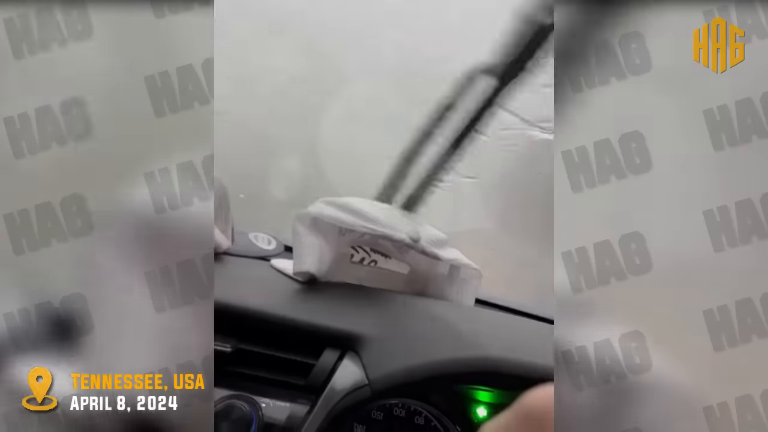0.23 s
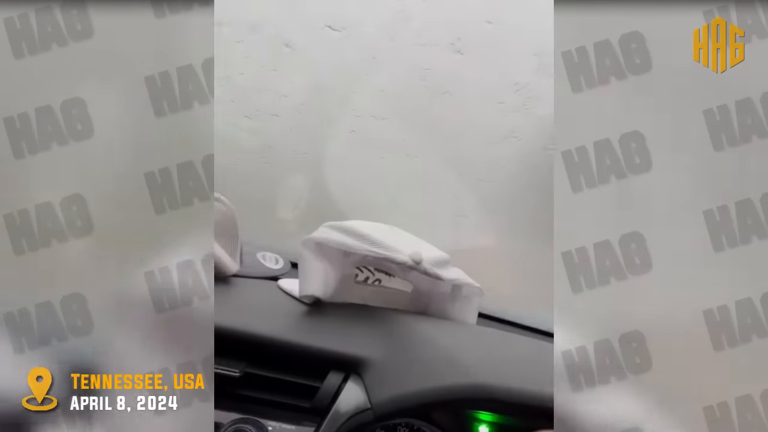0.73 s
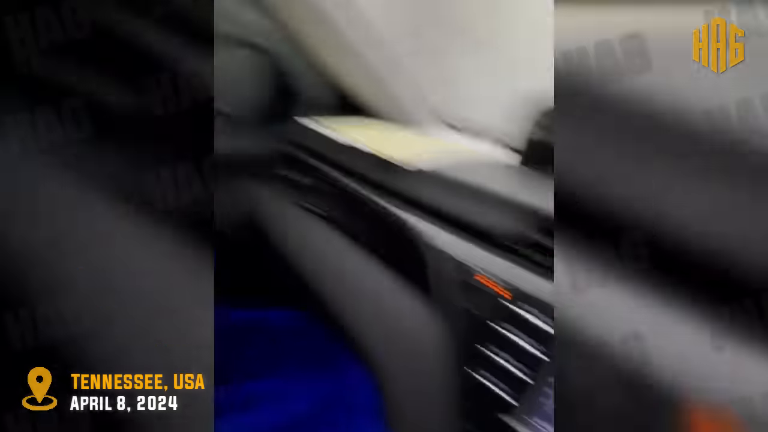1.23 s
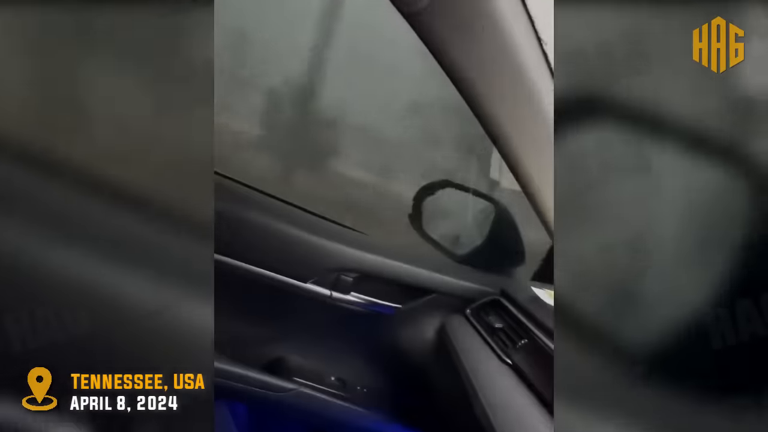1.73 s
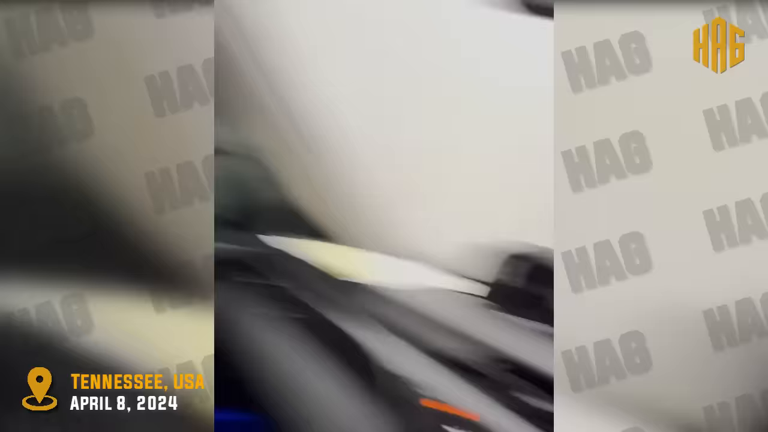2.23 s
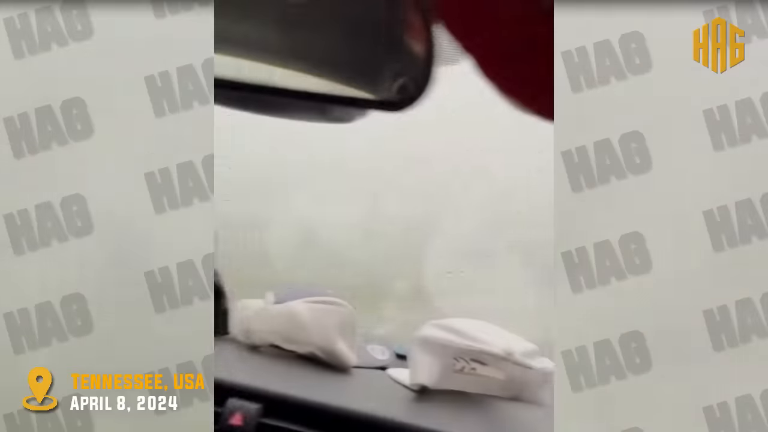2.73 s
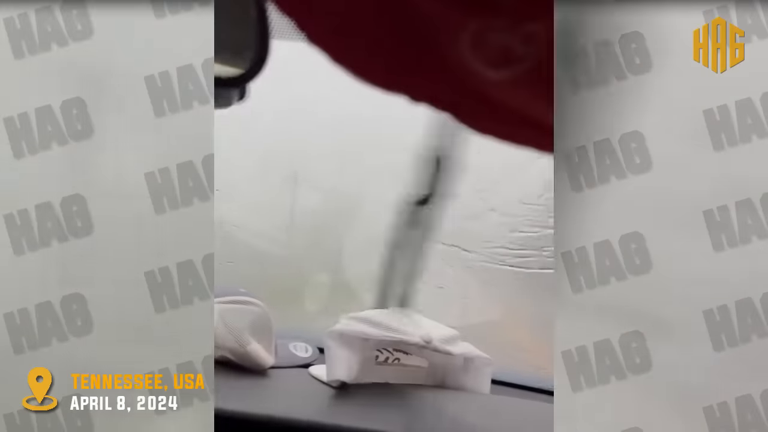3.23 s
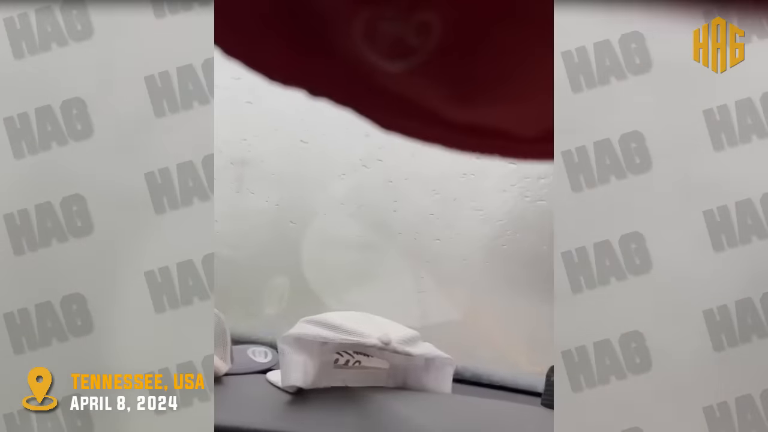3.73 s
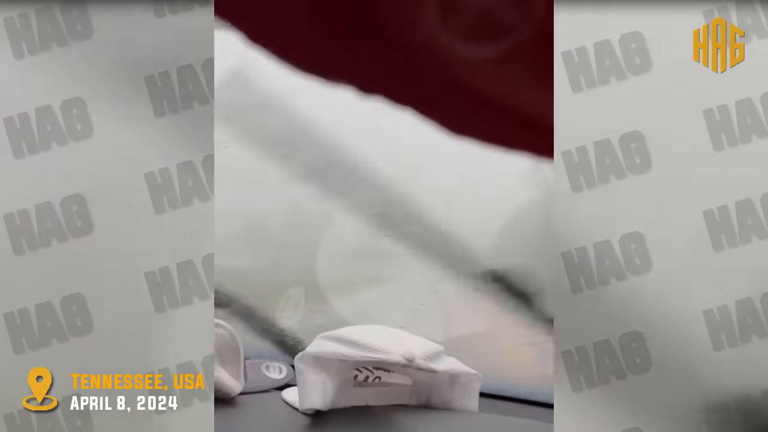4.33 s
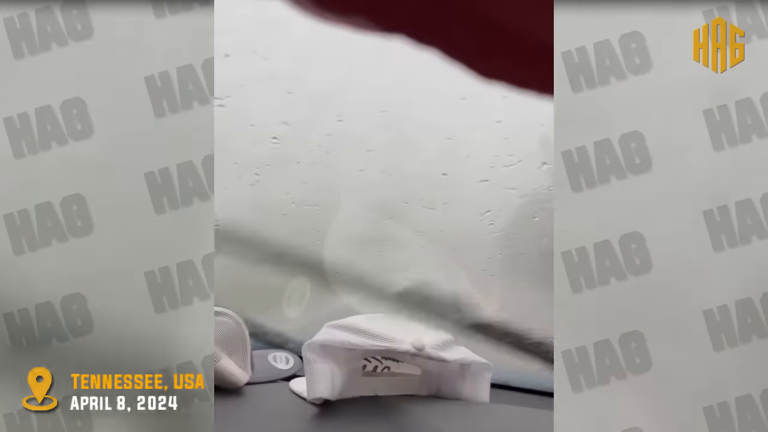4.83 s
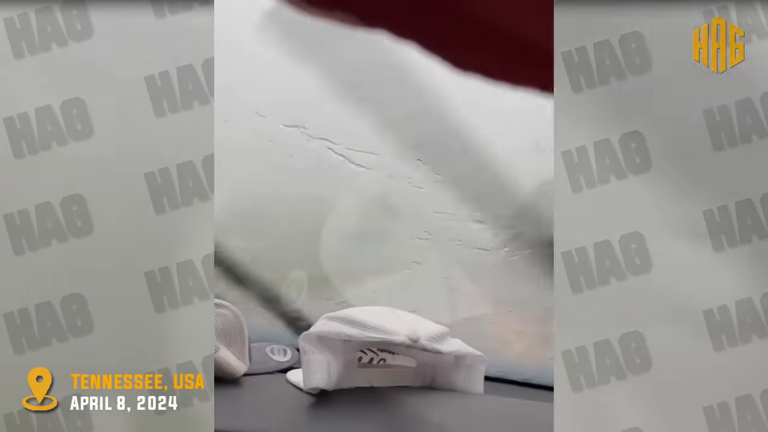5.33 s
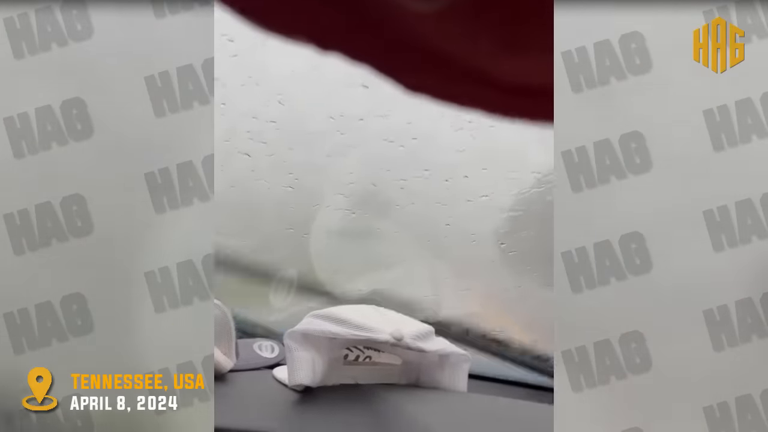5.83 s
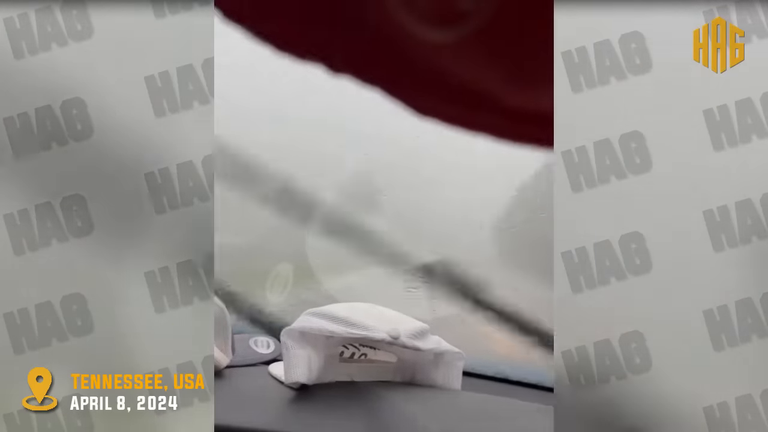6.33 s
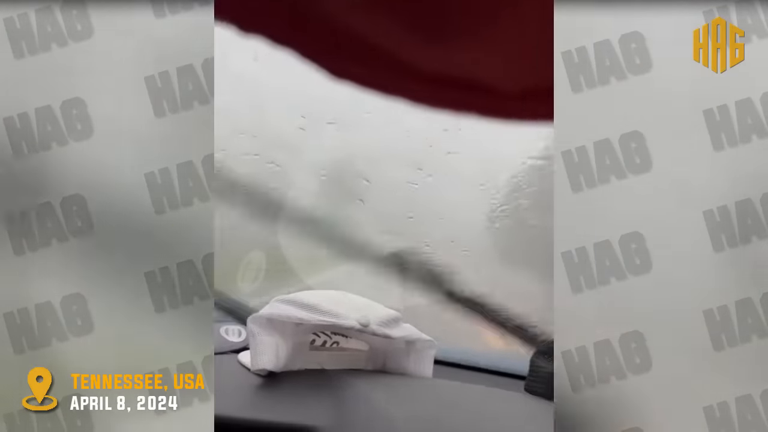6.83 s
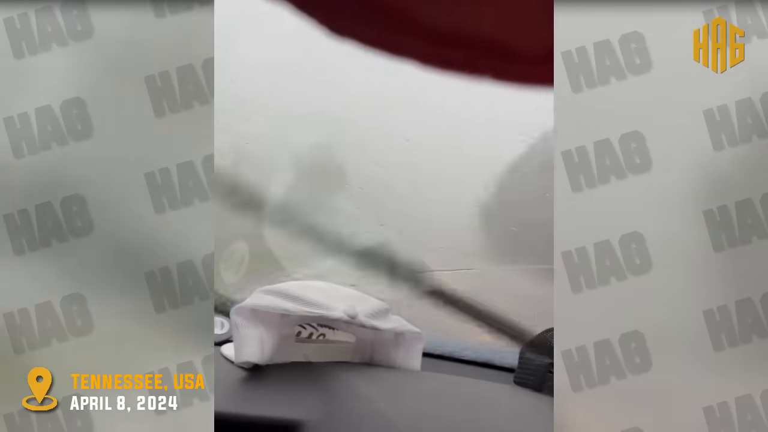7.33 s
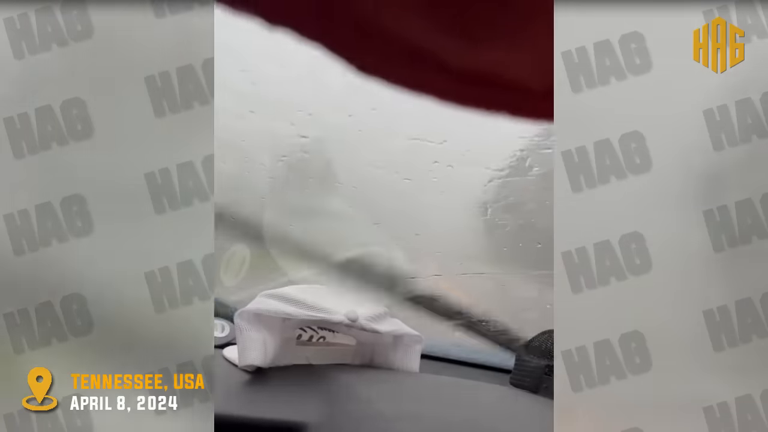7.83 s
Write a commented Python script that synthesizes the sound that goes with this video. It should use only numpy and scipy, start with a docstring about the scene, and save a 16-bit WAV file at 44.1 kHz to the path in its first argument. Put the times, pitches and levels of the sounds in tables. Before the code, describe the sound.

Heard from the driver's seat of a closed car: big hailstones strike the roof with blunt, boomy thuds and knock on the windshield with short cracks. Small stones tick and splinter over a faint uneven patter and low rumble. Blows are thick at the start, strongest around three to five seconds, then sparser. Close, nearly mono pickup, loud peaks slightly squashed.

```python
"""Hail on a car

Hail falls on a car, heard from the driver's seat: impact excitation of plates and of the cabin air.
Big stones thud on the lined steel roof and knock on the windshield: noise bursts shaped by resonances,
whose dispersive bending waves arrive as a quick falling chirp. Small stones tick and shatter on the glass
over a fine patter of noise under random impact envelopes and a low, filtered-noise cabin rumble."""
import sys
import numpy as np
from scipy import signal
from scipy.fft import rfft, irfft
from scipy.io import wavfile
from scipy.ndimage import uniform_filter1d, minimum_filter1d

SR = 44100
rng = np.random.default_rng(int(sys.argv[2]) if len(sys.argv) > 2 else 0)


def master(y):
    """Save y as 16-bit WAV."""
    cut = np.clip(np.atleast_2d(y).T, -1, 1)
    pcm = np.round(cut * 32767)  # scale
    wavfile.write(sys.argv[1], SR, pcm.astype(np.int16))


N = 355710
BLOW_SIZE = 2 ** 14  # samples computed for each blow
BLOW_S = np.arange(BLOW_SIZE) / SR
BLOW_HZ = np.fft.rfftfreq(BLOW_SIZE, 1 / SR)
ALL_HZ = np.fft.rfftfreq(N, 1 / SR)
LEVEL_SPAN_S = 0.02  # a blow has the energy of rms 1 held this long
TYPICAL_BLOW_DB = -16  # table knock level at which the force of a big stone counts as 0 dB

# All table levels are relative: the *_db settings of the functions shift each voice as a whole.

# big stones on the roof: (time [s], knock [dB], boom above the knock [dB],
# basic ring t60 [s], pitch of the struck spot [Hz])
ROOF_HITS = [(0.062,-8,-19,0.13,380),(0.117,-9,-0.5,0.17,660),(0.171,-22,8,0.31,410),(0.462,-21,0,0.27,365),(0.536,-15.5,2.5,0.13,325),(0.607,-14.5,-4,0.16,342),(1.002,-20,2,0.13,495),(1.391,-22,-8,0.17,275),(1.575,-22,-1,0.26,430),(1.78,-16.5,-4,.21,377),(1.92,-22.5,-20,0.2,600),(2.052,-23.5,2,0.13,410),(2.078,-7.5,-3,0.15,302),(2.103,-11,1,0.16,567),(2.234,-23.5,-7,0.063,278),(2.405,-13.5,-26,0.18,300),(2.594,-22.5,-12,0.11,630),(2.685,-13,2.5,0.098,480),(3.037,-14.5,-2,0.12,298),(3.267,-11,10.5,0.21,267),(3.303,0,-3,0.18,332),(3.335,-10.5,5,0.244,374),(3.843,-21.5,-5,0.25,420),(4.229,-23.5,0,0.11,484),(4.256,-1.5,-5.5,0.095,595),(4.42,-25,-1,0.52,523),(4.8,-26,6,0.35,273),(5.341,-7.5,1.5,0.14,363),(5.37,-19,-3,.19,324),(5.472,-19.5,-7,0.14,780),(6.227,-32,-14,0.21,660),(6.56,-21,4.5,0.23,362),(6.808,-21.5,2.5,0.39,640),(6.946,-30.5,11.5,0.11,229),(7.528,-8,0.5,0.21,623),(7.744,-24,4,0.17,374)]
# knock of a struck panel: (frequency [Hz], density [dB per Hz])
KNOCK = [(120, -16.5), (210, -1), (360, 2), (510, -4), (670, -2.5), (920, -12.5), (1900, -50.5)]
# boom of the cabin air: (frequency [Hz], density [dB per Hz])
BOOM = [(22, -38), (42, 0), (70, -2.5), (125, 5.5), (165, 6.5), (215, -18), (400, -73)]
# crack of a stone on the roof: (frequency [Hz], density [dB per Hz])
ROOF_CRACK = [(550, -14.5), (850, -1), (1180, 6.5), (3200, -11.5), (7500, -17), (16000, -50)]
ROOF_CRACK_FOLLOWS = 0.72  # dB of crack per dB of knock: the lining softens the crack


def roof(knock_db=1.5, boom_db=2.0, crack_db=-26.5, travel_s=0.001494, swell=0.036, near_s=0.071,
         boom_ring=1.08, crack_ring=0.742):
    """Coupled plate and cavity: the steel rings behind its lining; the cabin air builds up and dies slowest."""
    out = np.zeros((2, N))
    path = bending(travel_s)
    knock, boom, crack = (body(spectrum) * path for spectrum in (KNOCK, BOOM, ROOF_CRACK))
    for s, db, boom_rel, t60, hz in ROOF_HITS:
        force_db = db - TYPICAL_BLOW_DB
        boom_level = db + boom_rel
        crack_level = ROOF_CRACK_FOLLOWS * force_db
        direct = (near_s / t60) ** 2  # short blows land close by: their direct wave dominates
        struck_spot = spot(hz, lift=1.6, sharpness=11.3)
        # the boom crosses the bending path twice
        cavity = boom * path * cabin_boom(boom_level)
        wave = from_db(knock_db + db) * blow(knock * struck_spot, t60, swell, direct)
        wave += from_db(boom_db + boom_level) * blow(cavity, t60 * boom_ring, 2 * swell, direct)
        wave += from_db(crack_db + crack_level) * blow(crack, t60 * crack_ring, swell, direct)
        add(out, s - travel_s, wave)
    return out


# big stones on the windshield: (time [s], knock [dB], boom above the knock [dB], crack above the knock [dB])
GLASS_HITS = [(0.746,-33.5,-7,4.5),(2.297,-12.5,-2,-11.5),(2.326,-27.5,-6,1),(2.549,-23,-16,-5),(2.87,-32,-10,-5.5),(3.129,-19,-7,-4.5),(3.709,-15,0,-3.5),(4.027,-31.5,-12,0),(4.147,-25,-7,-5),(4.752,-19,-12.5,-11),(4.938,-6,3,-10.5),(4.999,-5,-12,-26),(5.073,-22.5,-16,-11),(5.171,-18,-2,-2.5),(5.913,-14,2.5,-7),(6.462,-32.5,2,-1),(7.21,-28,-11,-15),(7.689,-21,7,-2)]
# crack of a stone on glass: (frequency [Hz], density [dB per Hz])
GLASS_CRACK = [(350, -4), (900, 2), (1500, 0), (2400, 2), (3600, -5), (7000, -26)]
# splintering ice: (frequency [Hz], density [dB per Hz])
SPLINTER = [(1500, -16.5), (3200, -0.5), (4900, 1.5), (5800, 4.5), (8600, 0.5), (10800, -8), (15500, -12),
            (17000, -137)]
GLASS_RING_S = 0.0553  # t60 of the knock
# a heavier stone stays longer in contact, so its splinter falls behind its crack
SPLINTER_DULLING = 0.59  # dB per dB of knock


def windshield(knock_db=0.0, boom_db=0.0, crack_db=1.0, splinter_db=-6.0, travel_s=0.0022, swell=0.027,
               direct=1.36, boom_ring=1.54, crack_ring=0.616, splinter_ring=0.7):
    """Damped plate: laminated glass gives a strong direct chirp and a short ring, with splintering ice on top."""
    out = np.zeros((2, N))
    path = bending(travel_s)
    knock, boom, crack, splinter = (body(spectrum) * path for spectrum in (KNOCK, BOOM, GLASS_CRACK, SPLINTER))
    cavity = boom * spot(hz=108, lift=0.97, sharpness=2.2)
    for s, db, boom_rel, crack_rel in GLASS_HITS:
        boom_level, crack_level = db + boom_rel, db + crack_rel
        splinter_level = crack_level - SPLINTER_DULLING * (db - TYPICAL_BLOW_DB)
        # the pane rings near the struck point
        ping = spot(1750 * 2 ** rng.uniform(-0.49, 0.18), lift=1.15, sharpness=4.2)
        wave = from_db(knock_db + db) * blow(knock, GLASS_RING_S, swell, direct)
        wave += from_db(boom_db + boom_level) * blow(cavity, GLASS_RING_S * boom_ring, swell, direct)
        wave += from_db(crack_db + crack_level) * blow(
            crack * ping, GLASS_RING_S * crack_ring, swell, direct / 2)
        wave += from_db(splinter_db + splinter_level) * blow(
            splinter, GLASS_RING_S * splinter_ring, swell, direct / 2)
        add(out, s - travel_s / 2, wave)
    return out


# the clearest small stones on the windows: (time [s], splinter [dB], ring t60 [s])
TICKS = [(0.065,-25,.09),(0.158,-25,0.03),(0.426,-29,0.013),(0.489,-27.5,0.022),(0.535,-31.5,0.066),(0.604,-25,.031),(0.831,-29,0.054),(0.928,-30,0.025),(1.008,-25.5,0.041),(1.019,-24,0.095),(1.094,-28.5,0.047),(1.314,-29.5,0.022),(1.486,-25.5,0.049),(1.677,-30,0.027),(1.903,-28.5,0.066),(1.965,-29.5,0.071),(2.017,-29,0.017),(2.192,-26.5,0.03),(2.314,-28.5,0.034),(2.613,-28.5,0.028),(2.664,-24.5,0.031),(2.791,-36,0.028),(2.814,-33.5,0.047),(3.154,-34,0.033),(3.291,-25,0.038),(3.449,-35,0.024),(3.791,-34.5,0.073),(3.842,-35,0.031),(4.512,-48,.033),(4.639,-38,0.018),(5.055,-29,.04),(5.303,-28,0.038),(5.473,-30,0.11),(5.684,-32,0.021),(5.761,-31,0.025),(5.841,-31.5,0.096),(6.122,-32,0.039),(6.431,-36,0.05),(6.498,-36.5,0.061),(6.712,-35.5,0.031),(6.762,-37,0.035),(6.809,-36.5,.035),(6.882,-31.5,0.05),(7.089,-33,0.029),(7.266,-34,0.031),(7.457,-34,0.03),(7.524,-24.5,0.03),(7.562,-13.5,0.022),(7.899,-30,.03),(7.936,-24.5,0.036)]


def small_stones(splinter_db=0.0, crack_db=-5.0, knock_db=-4.5, travel_s=0.001, swell=0.04, near_s=0.021):
    """Contact time: light stones touch briefly and mostly splinter; hardness tilts the splinter's spectrum."""
    out = np.zeros((2, N))
    path = bending(travel_s)
    knock, crack, splinter = (body(spectrum) * path for spectrum in (KNOCK, GLASS_CRACK, SPLINTER))
    stones = list(TICKS) + strays()
    characters = rng.uniform(-0.84, 1, (len(stones), 2))
    for (s, db, t60), (place, hardness) in zip(stones, characters):
        direct = (near_s / t60) ** 2  # short ticks have the stronger direct wave
        ping = spot(2000 * 2 ** (place / 2), lift=0.39, sharpness=27.0)
        brightness = (BLOW_HZ + 1) ** (0.5 * hardness)
        wave = from_db(splinter_db) * blow(splinter * brightness, t60, swell, direct)
        wave += from_db(crack_db) * blow(crack * ping, t60, swell, direct)
        wave += from_db(knock_db) * blow(knock, t60, swell, direct)
        add(out, s - travel_s / 2, from_db(db) * wave)
    return out


def strays(count=100, per_s=8, level_db=-40, spread_db=2.5, t60=0.037):
    """Poisson arrivals: fainter small stones at random moments, as rows (time [s], splinter [dB], t60 [s])."""
    times = np.cumsum(rng.exponential(1, count)) / per_s
    levels = level_db + spread_db * rng.standard_normal(count)
    return list(zip(times, levels, np.full(count, t60)))


# strength of the shower: (time [s], drumming on the body [dB], patter on the glass [dB])
SHOWER = [(0.06, -22, -51), (0.35, -35.5, -42), (1.2, -40.5, -48.5), (2.18, -34.5, -42.5), (2.98, -43, -53),
          (5.12, -42, -42), (5.72, -45, -56.5), (7.32, -47, -49.5), (7.75, -34.5, -43),
          (8.06, -40.5, -52.5)]


def shower(drum_db=3.5, drum_crack_db=-7.0, patter_db=0.0, patter_crack_db=-3.0, hiss_db=0.0,
           patter_width_db=-12):
    """Superposed impacts: countless lesser stones drum on the body and patter on the glass, above the rumble."""
    s, drum_points, patter_points = np.transpose(SHOWER)
    seconds = np.arange(N) / SR
    drum_level = np.interp(seconds, s, drum_points)
    patter_level = np.interp(seconds, s, patter_points)
    noise = rng.standard_normal((4, 2, N))
    drumming = from_db(drum_level) * hail_cloud(per_s=50, spread_db=0.5, t60=0.19)
    near = hail_cloud(per_s=50, spread_db=8.0, t60=0.028)
    far = hail_cloud(per_s=35, spread_db=12.5, t60=0.42)
    width = from_db([[0], [patter_width_db]])  # gains of the common and scattered rows
    patter = from_db(patter_level) * np.hypot(near, from_db(hiss_db) * far) * width
    out = from_db(drum_db) * drumming * coloured(noise[0], KNOCK)
    out += from_db(drum_crack_db) * drumming * coloured(noise[1], ROOF_CRACK)
    # faint stones lose their top on the way
    muffle = signal.butter(2, 12000, fs=SR, output="sos")
    out += from_db(patter_db) * patter * signal.sosfilt(muffle, coloured(noise[2], SPLINTER))
    out += from_db(patter_crack_db) * patter * coloured(noise[3], GLASS_CRACK)
    return out + rumble(drum_level)


# rumble of the cabin: (frequency [Hz], density [dB per Hz])
RUMBLE = [(18, -27), (42, 3), (125, 4.5), (200, -7), (500, -44.5)]


def rumble(drum_level, level_db=-32.0, follows=0.68):
    """Filtered noise: the cabin's low rumble swells by a part of each dB of drumming."""
    swell_db = follows * (drum_level - drum_level.mean())
    return from_db(level_db + swell_db) * coloured(rng.standard_normal((2, N)), RUMBLE)


def blow(response, t60, swell, direct, crumble_db=2.5):
    """Impulse response of one impact as (common, scattered) rows: a direct wave, then uneven reflections."""
    age = BLOW_S / t60
    bunching_db = crumble_db * np.interp(age, np.linspace(0, 1, num=32), rng.standard_normal(size=32))
    build_up = 1 - np.exp(-age / abs(swell))
    envelope = build_up * from_db(bunching_db - 60 * age)
    wave = rng.standard_normal((2, BLOW_SIZE)) * envelope
    wave /= np.linalg.norm(wave, axis=1, keepdims=True)
    wave[0, 0] += direct
    # the wave circles between the struck point and the nearest edge, which colours the ring of each hit
    reflection = 0.28 * np.sign(rng.standard_normal())
    edge_echo = 1 / (1 - reflection * bending(rng.uniform(0.001, 0.003)))
    wave = irfft(rfft(wave) * response * edge_echo)
    return wave / np.linalg.norm(wave, axis=1, keepdims=True) * np.sqrt(LEVEL_SPAN_S * SR)


def bending(travel_s):
    """Dispersion: bending-wave speed grows with the root of frequency; travel_s is the delay at 1 kHz."""
    return np.exp(-4j * np.pi * travel_s * np.sqrt(1000 * BLOW_HZ))


def spot(hz, lift, sharpness):
    """Resonance: each struck spot favours one frequency of its own."""
    return 1 + lift / (1 + 1j * sharpness * (BLOW_HZ / hz - hz / (BLOW_HZ + 1)))


def cabin_boom(db, typical_hz=112, rise_octaves_per_db=0.24, darkening_per_db=0.06):
    """Cavity resonance: a stronger boom rings higher, within 64 to 128 Hz, and its spectrum tilts darker."""
    force_db = db - TYPICAL_BLOW_DB
    hz = typical_hz * 2 ** (rise_octaves_per_db * force_db)
    tilt = np.maximum(BLOW_HZ, 45) ** (-darkening_per_db * max(force_db, 0))
    return tilt * spot(np.clip(hz, 64, 128), lift=1.15, sharpness=4.1)


def hail_cloud(per_s, spread_db, t60):
    """Shot noise: the envelope of uneven stones landing at random, each decaying 60 dB in t60; rms 1."""
    sizes = from_db(spread_db * np.minimum(rng.exponential(1, N), 2.5))
    landed = rng.random(N) < per_s / SR
    keep = from_db(-120 / (t60 * SR))  # power kept from sample to sample
    power = signal.lfilter([1], [1, -keep], landed * sizes ** 2 + 1e-12)
    return rms_one(np.sqrt(power))


def body(spectrum):
    """Minimum phase: the causal response with the given spectrum, by folding its cepstrum."""
    cepstrum = irfft(np.log(from_db(at_hz(spectrum, BLOW_HZ))))
    cepstrum[1:BLOW_SIZE // 2] *= 2
    cepstrum[BLOW_SIZE // 2 + 1:] = 0
    return np.exp(rfft(cepstrum))


def coloured(x, spectrum):
    """Linear filtering: convolution gives a signal a spectrum; rms 1."""
    impulse = irfft(body(spectrum))[None]
    return rms_one(signal.fftconvolve(x, impulse, axes=1)[:, :N])


def add(out, s, wave):
    """Superposition: mix a wave in at time s, cut at the end of the sound."""
    start = int(np.clip(s * SR, 0, N - 1))
    out[:, start:start + BLOW_SIZE] += wave[:, :N - start]


def at_hz(points, hz):
    """Interpolation of a table on a log-frequency axis."""
    knots, values = np.transpose(points)
    return np.interp(np.log(hz + 1), np.log(knots), values)


def from_db(db):
    """Level law: decibels to amplitude gain."""
    return 10 ** (np.asarray(db) / 20)


def rms_one(x):
    """Normalisation to rms 1."""
    return x / np.sqrt(np.mean(x ** 2) + 1e-20)


# gain of the scattered row, which differs between the two microphones: (frequency [Hz], gain [dB])
SCATTER = [(100,-36),(300,-21.5),(480,-14),(850,-10),(1200,-15.5),(1800,-37),(4000,-32),(7200,-3),(8400,-10),(9600,-24),(13000,-18),(15000,-4)]
# phase by which the left microphone port leads: (frequency [Hz], phase [rad])
PORT_PHASE = [(5500, 0), (7600, -1.6), (8200, 0), (13000, 0), (15000, -1.1)]


def scene():
    """Sum and difference: all sources reach two closely spaced microphones, nearly alike in both."""
    common, scattered = rfft(roof() + windshield() + small_stones() + shower())
    scattered = scattered * from_db(at_hz(SCATTER, ALL_HZ))
    sides = np.array([[1], [-1]])  # left, right
    ports = np.exp(0.5j * sides * at_hz(PORT_PHASE, ALL_HZ))
    # the lows are a little stronger on the left
    lean = from_db(sides * at_hz([(40, 0), (220, 0.73), (1000, 0.055)], ALL_HZ))
    return irfft((common + sides * scattered) * ports * lean, N)


def limiter(x, ceiling=1.0, release_db_per_s=60):
    """Gain reduction: the level drops just ahead of peaks above the ceiling, then recovers steadily."""
    over_db = np.maximum(20 * np.log10(np.abs(x).max(axis=0) / ceiling + 1e-9), 0)
    ramp = release_db_per_s * np.arange(N) / SR
    gain_db = ramp - np.maximum.accumulate(over_db + ramp)
    early_db = minimum_filter1d(gain_db, size=65)
    return x * from_db(uniform_filter1d(early_db, size=65))


def record(dry):
    """Saturation and band limiting: after a silent moment, peaks are limited and rounded and the top is cut."""
    started = np.clip((np.arange(N) / SR - 0.05) / 0.003, 0, 1)
    limited = limiter(dry * started)
    rounded = limited / (1 + limited ** 4) ** (1 / 4)
    low_pass = signal.ellip(10, 0.1, 80, 16300, fs=SR, output="sos")  # cutoff 16300 Hz
    return signal.sosfilt(low_pass, rounded)


dry = scene()
out = record(dry)
master(out)
```